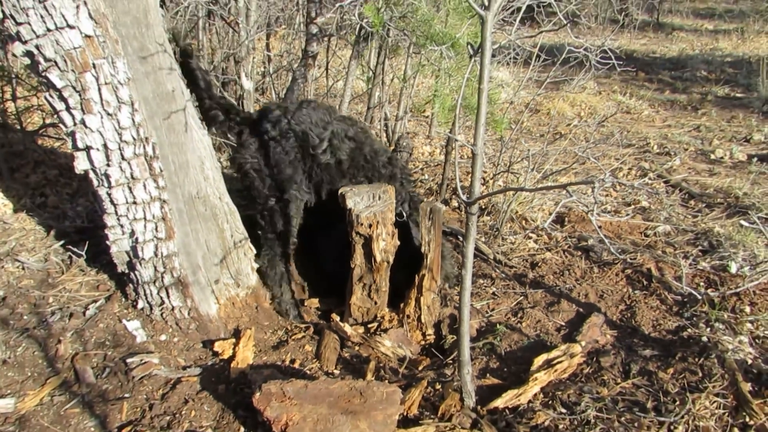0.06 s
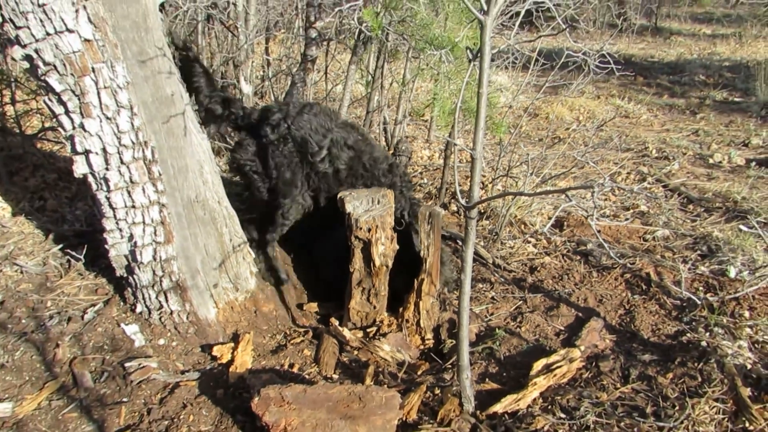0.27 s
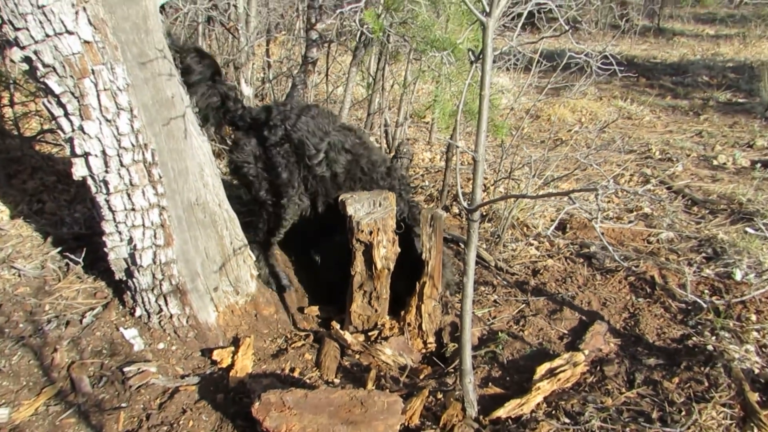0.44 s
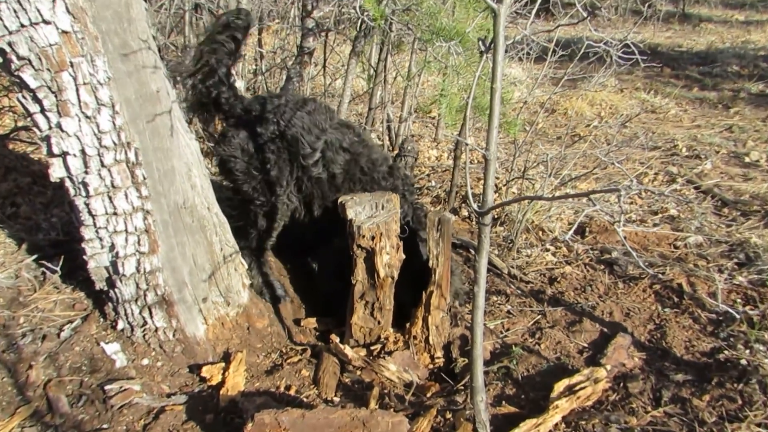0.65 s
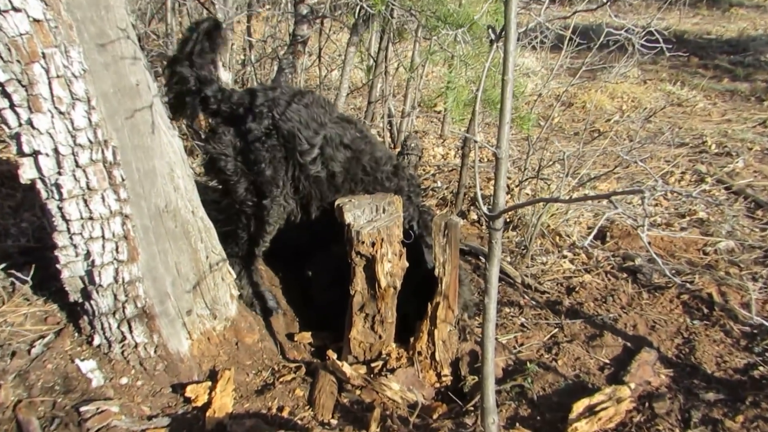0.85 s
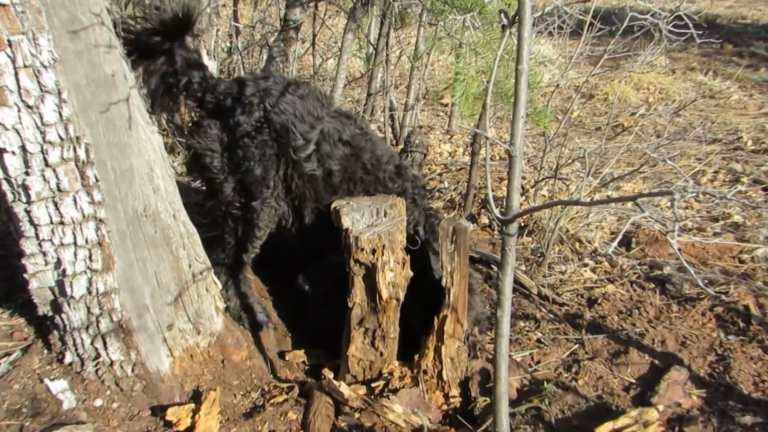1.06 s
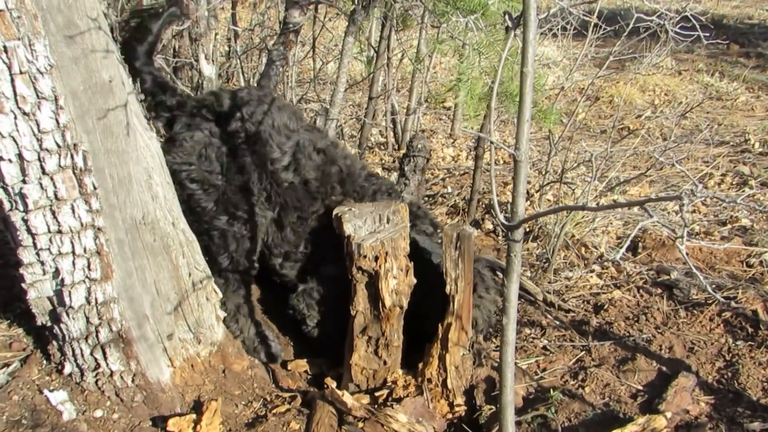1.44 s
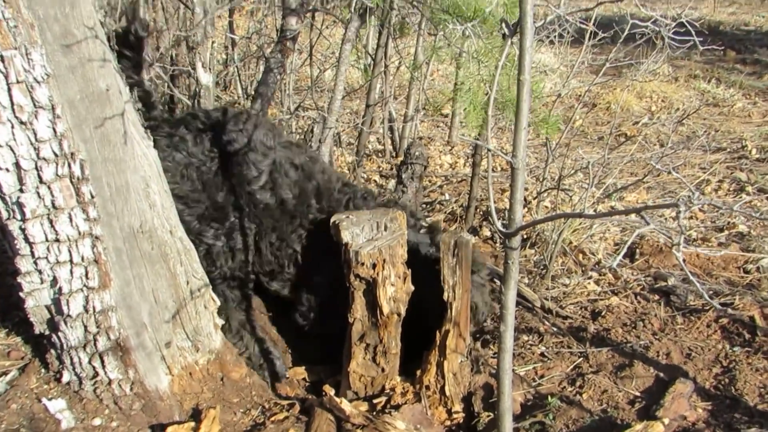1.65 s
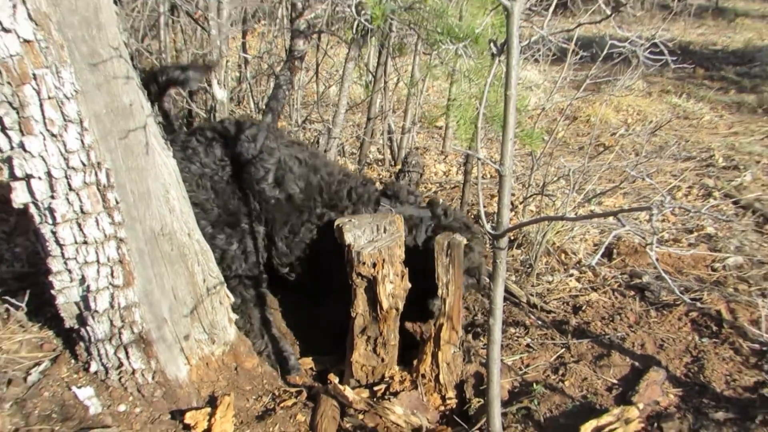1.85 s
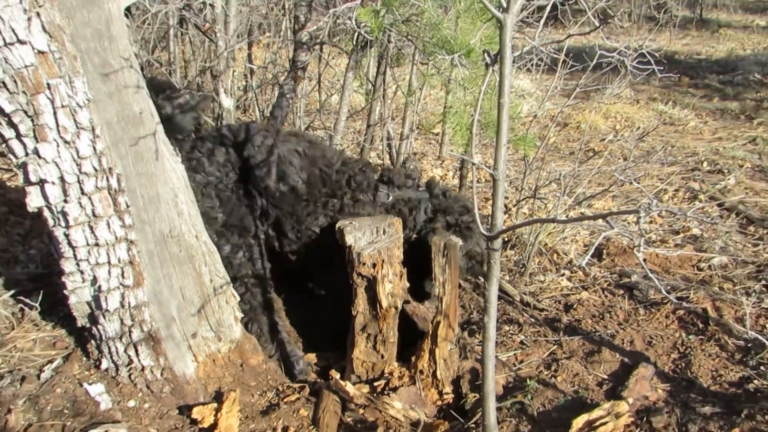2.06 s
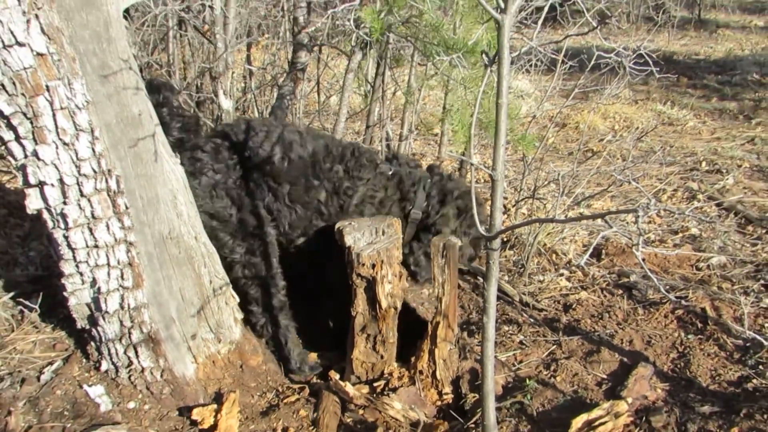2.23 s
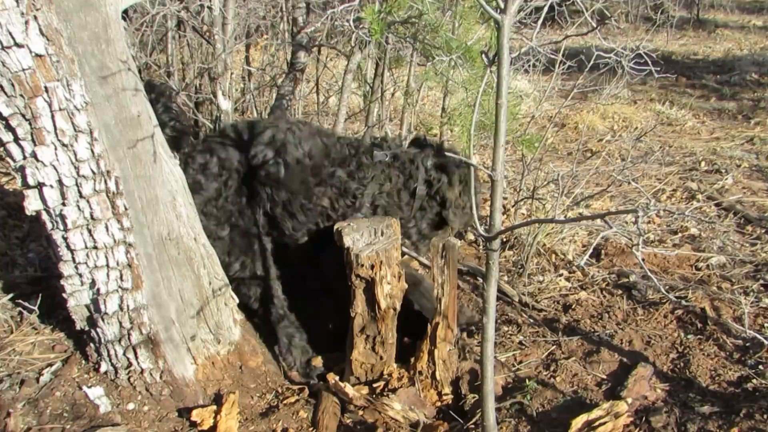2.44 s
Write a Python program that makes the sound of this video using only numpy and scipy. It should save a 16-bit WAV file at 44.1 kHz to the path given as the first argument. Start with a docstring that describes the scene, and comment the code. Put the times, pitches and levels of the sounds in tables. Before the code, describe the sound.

Rotten wood cracks and scrapes as a dog tears at it, with wind buffeting the microphone.

```python
"""Wood scrapes, cracks and splinters as a dog tears at a rotten stump in open woodland.
Each break is a run of snapping fibres that makes the stump ring. Twigs tick and a paw thuds on soil.
Gusts buffet the camera's microphone, pushing its two channels opposite ways and overloading it.
Behind are a soft rush of air in the trees, hiss and the faint whine of the lens motor."""
import sys
import numpy as np
from scipy import signal
from scipy.fft import rfft, irfft, next_fast_len
from scipy.io import wavfile
from scipy.ndimage import uniform_filter1d, minimum_filter1d, map_coordinates

SR = 44100
rng = np.random.default_rng(int(sys.argv[2]) if len(sys.argv) > 2 else 0)


def int16_out(signal):
    """Quantize to a 16-bit WAV file."""
    q = np.round(np.clip(np.atleast_2d(signal).T, -1, 1) * 32767)
    wavfile.write(sys.argv[1], SR, q.astype(np.int16))


N = 110250  # 2.5 seconds

# Loudness shared by the air, hiss and motor, with dips just after the hard gusts: time_s, level_db
BACKGROUND_LEVEL = [(0, -44), (.3, -40), (.53, -38), (.58, -47), (.86, -41.5), (.885, -49), (1.13, -44.5),
                    (1.16, -52), (1.54, -47), (1.6, -45), (1.76, -43), (1.785, -49), (1.99, -44),
                    (2.02, -46), (2.3, -43.5), (2.5, -42)]


def cracks(attack_s=.00028, crack_s=.0028):
    """Snapping fibres ring the stump and the piece that gives way, over a hollow knock."""
    # One row per break: start_s, ring_db, knock_db, snap_db, splinter_db, left_minus_right_db,
    # piece_hz, piece_fade_s, knock_hz, snap_hz, splinter_hz
    breaks = [(0.3201, -24.5, -25.5, -27, -36, -3, 1760, 0.017, 906, 3310, 9700),
              (.354, -36, -39, -38.5, -38.5, -3.5, 1920, 0.015, 1020, 4400, 11300),
              (0.402, -35, -39.5, -39, -57, -2, 1970, .02, 970, 3400, 9500),
              (0.4154, -33.5, -34.5, -44.5, -69, -11, 1980, 0.0081, 1075, 3540, 6900),
              (0.4306, -18, -28, -26, -49, -0.5, 2000, 0.036, 1640, 3320, 8700),
              (1.1363, -35.5, -29.5, -42, -45.5, -1, 1670, 0.042, 1142, 3840, 13700),
              (1.5533, -33.5, -32.5, -35.5, -50, -1, 1757, 0.039, 910, 3450, 11700),
              (1.590, -38, -38.5, -37, -40.5, -1, 2120, 0.011, 1020, 4540, 12300),
              (1.8683, -35.5, -36, -50, -51, -7, 2260, 0.024, 1086, 3900, 10500),
              (1.9951, -33, -28.5, -44, -47, -3.5, 1290, 0.058, 824, 4120, 13400)]
    # Tone of the hollow knock: pitch_hz, level_db
    knock_shape = [(200, -15), (600, 2), (830, 9), (1100, -8.5), (1400, 8.5), (2200, -18), (5000, -107)]
    # Tones of the sharp snap and the thin splinter: pitch_multiple, level_db
    snap_shape = [(.33, -37), (.83, 5), (1, 4), (1.28, 0.5), (1.67, -13.5), (2.1, -11.5), (4.2, -18)]
    splinter_shape = [(.3, 0), (.55, 4.5), (.85, 2), (1, 4.5), (1.2, -9), (1.7, -32)]
    out, t = np.zeros((2, N)), np.arange(SR // 8) / SR

    def fade(fade_s):  # a fast rise, then a fall of 60 dB in fade_s
        return amp(-60 * t / fade_s) * (1 - np.exp(-t / attack_s))

    def same_energy(x):  # as much energy as a level of 1 held for crack_s
        return x / np.sqrt(np.sum(x ** 2, -1, keepdims=True) / (crack_s * SR))

    def tone(hz, fade_s, right_phase):
        phase = 2 * np.pi * hz * t + np.array([[0], [right_phase]])
        return same_energy(np.sin(phase) * fade(fade_s))

    def fibres(fade_s, response, spiky_db=5):
        sizes = amp(spiky_db * rng.standard_normal(len(t)))
        burst = rng.standard_normal((2, len(t))) * sizes * fade(fade_s)
        return same_energy(filtered(burst, response))

    for (start_s, ring_db, knock_db, snap_db, splinter_db, pan_db,
         piece_hz, piece_fade_s, knock_hz, snap_hz, splinter_hz) in breaks:
        piece = amp(1) * tone(piece_hz, piece_fade_s, np.pi / 2)
        ring = amp(ring_db) * same_energy(fibres(.02, stump) + piece)
        hollow = amp(-1) * tone(knock_hz, .027, np.pi / 4)
        knock = amp(knock_db) * same_energy(fibres(.027, colour(knock_shape)) + hollow)
        snap_filter = colour([(k * snap_hz, db) for k, db in snap_shape])
        snap = amp(snap_db) * fibres(.02, snap_filter)
        splinter_filter = colour([(k * splinter_hz, db) for k, db in splinter_shape])
        splinter = amp(splinter_db) * fibres(.014, splinter_filter)
        pan = amp([[pan_db / 2], [-pan_db / 2]])
        add(out, start_s, (ring + knock + snap + splinter) * pan)
    return out


def stump(hz):
    """The stump acts as a filter that favours the few pitches it rings at."""
    # The wood's ringing pitches: pitch_hz, width_hz, level_db
    rings = [(1560, 120, -26), (1840, 420, 7), (2096, 240, 9.5), (2400, 98, 6.5), (2730, 130, 1.5),
             (3240, 35, -48)]
    return sum((-1) ** k * amp(db) * 1j * hz * width / (pitch ** 2 - hz ** 2 + 1j * hz * width)
               for k, (pitch, width, db) in enumerate(rings))


def scrapes():
    """Teeth and claws drag over crumbling wood."""
    # One row per scrape: middle_s, length_s, level_db
    strokes = [(.07, 0.09, -53), (0.197, 0.046, -46), (0.384, 0.066, -43), (0.474, 0.063, -61),
               (0.514, 0.014, -40.5), (0.824, 0.4, -56), (0.989, 0.024, -49.5), (1.426, 0.096, -55),
               (1.645, 0.11, -50), (1.73, 0.0076, -42.5), (1.76, 0.029, -48), (1.864, 0.042, -46)]
    # Tone of the scraping: pitch_hz, level_db
    shape = [(900, 3), (1600, -3.5), (2200, 4), (2600, -2.5), (3300, -16), (5200, -18.5), (7000, -19.5),
             (12000, -22), (15500, -25)]
    return grainy_strokes(strokes, shape, grainy_db=4, alike=-.48)


def twigs():
    """Thin twigs break with one tick each."""
    # One row per twig: start_s, level_db, pitch_hz
    breaks = [(0.981, -52, 6000), (2.2742, -43.5, 11500), (2.4104, -38, 3950)]
    out = np.zeros((2, N))
    for start_s, db, hz in breaks:
        add(out, start_s, tick(db, hz))
    return out


def rustles():
    """Dry litter shifts on the woodland floor."""
    # One row per rustle: middle_s, length_s, level_db
    strokes = [(.185, .07, -68), (.218, 0.0076, -55), (2.22, 0.12, -69.5)]
    # Tone of the dry litter: pitch_hz, level_db
    shape = [(2000, -38), (6000, -2), (12000, 0), (14000, -8), (15500, -22)]
    return grainy_strokes(strokes, shape, grainy_db=3.5, alike=.55)


def paw(start_s=2.204, level_db=-33.5, rise_s=.0033, fade_s=.27):
    """A paw lands in loose earth with a dull thud."""
    # Tone of the thud: pitch_hz, level_db
    shape = [(15, -48), (60, -4), (130, -9), (210, 0.5), (300, -11), (450, -35), (1200, -27), (4000, -41.5),
             (15000, -88)]
    t = np.maximum(np.arange(N) / SR - start_s, 0)
    level = amp(level_db - 60 * t / fade_s) * (1 - np.exp(-t / rise_s))
    return level * steady(noise(shape, alike=.9), span_s=.0175)


def trunk_echo(x, level_db=-19, fade_s=.35):
    """Tree trunks scatter the sound back as a weak, short echo."""
    t = np.arange(SR // 3) / SR
    tail = rng.standard_normal((2, len(t))) * amp(-60 * t / fade_s)
    tail /= np.linalg.norm(tail[0])
    return amp(level_db) * signal.fftconvolve(x, tail, axes=1)[:, :N]


def wind(strong_db=-15, eddies_per_s=70):
    """Stronger wind makes smaller, faster swirls (eddies), so it brightens as it swells."""
    # Wind strength at the microphone: time_s, level_db
    strength = [(0.0, -49), (0.04, -42.5), (0.1, -35), (0.15, -37), (0.2, -39), (0.31, -42), (0.35, -34),
                (0.4, -61), (0.455, -16), (0.505, -22), (0.56, -12.5), (0.59, -24), (0.65, -17),
                (0.69, -27.5), (0.77, -40), (0.8, -21.5), (0.82, -34.5), (0.855, -6.5), (0.88, -22),
                (1.01, -24.5), (1.03, -41), (1.07, -16.5), (1.18, -13.5), (1.2, -28), (1.24, -23.5),
                (1.29, -15.5), (1.43, -27.5), (1.48, -23.5), (1.55, -14), (1.61, -33.5), (1.67, -24.5),
                (1.755, -13.5), (1.78, -25.5), (1.84, -36), (1.9, -31), (1.98, -34.5), (2.07, -26),
                (2.17, -47), (2.19, -40), (2.24, -42), (2.26, -43), (2.34, -34), (2.44, -59), (2.47, -34),
                (2.5, -34)]
    # Tones of the large, middle and small eddies: pitch_hz, level_db
    rumble = [(4, -86), (14, 10.5), (26, 2), (45, 2.5), (80, 1), (130, -5), (250, -27.5), (600, -49.5),
              (1500, -100)]
    body = [(40, -41), (90, -3), (190, -7), (280, -15.5), (450, -31.5), (900, -77), (3000, -120)]
    flutter = [(120, -10.5), (260, 1.5), (390, -5), (560, -11.5), (800, -33), (1300, -40.5), (4000, -110)]
    gust_db = curve(strength) - strong_db
    eddy_count = np.arange(N) * eddies_per_s / SR
    # The smaller eddies come in random lumps.
    lumps = np.tanh(map_coordinates(rng.standard_normal(1000), [eddy_count], mode="wrap"))

    def layer(shape, db, growth, span_s, lumps_db):  # db in a strong gust; growth in dB per dB of wind
        level = amp(db + growth * gust_db + lumps_db * lumps)
        return level * steady(noise(shape, alike=-.9), span_s)

    return (layer(rumble, db=-18.5, growth=.8, span_s=.03, lumps_db=0)
            + layer(body, db=-21.5, growth=1.1, span_s=.02, lumps_db=3)
            + layer(flutter, db=-31.5, growth=1.45, span_s=.025, lumps_db=6))


def buffets(left_lag_s=.00028, left_db=-.8, skew=.12, overload_db=2):
    """Single eddies hit the microphone; the hardest overload it with a tick."""
    # One row per eddy: middle_s, peak_db, half_width_ms
    hits = [(.5395, 3.5, 1.1), (.8675, 4, 1.5), (1.1466, 2.2, .9), (1.7662, 6, 1.15), (.207, -6.5, 4.8),
            (.4761, -6.5, 2.13), (.5335, -1, 1.2), (.5565, 0, 1.9), (.802, -11, 2), (.854, -3, .9),
            (.8595, -4, .9), (1.1205, -5, 1.1), (1.141, -1.5, 1.7), (1.1775, -3, 1.3), (1.289, -13, .7),
            (1.319, -11, .7), (1.373, -6, 1.4), (1.428, -9, 7), (1.504, -2.5, 1.97), (1.546, -5, 1),
            (1.559, -5, 1.3), (1.629, -7.5, 1.82), (2.037, -14.5, 1.31)]
    t = np.arange(N) / SR - np.array([[left_lag_s], [0]])  # an eddy reaches the left side later
    out = np.zeros((2, N))
    for middle_s, db, half_width_ms in hits:
        offset = (t - middle_s) * 1000 / half_width_ms
        offset /= 1 + skew * np.tanh(offset)  # it arrives faster than it leaves
        # One push of pressure, with a rebound on either side.
        out += amp(db) * (1 - offset ** 2 / 2) * np.exp(-offset ** 2 / 2)
        if db > overload_db:
            add(out, middle_s, tick(db=-43, hz=8500))
    return out * np.array([[amp(left_db)], [-1]])  # the channels move opposite ways


def air_and_hiss():
    """Air rushes softly in the trees, with a fine hiss above it."""
    # Tones of the air and the hiss: pitch_hz, level_db
    air_shape = [(30, 3.5), (150, -11), (300, -4.5), (750, -3.5), (1200, -8.5), (2000, -17), (3500, -29),
                 (6000, -50), (15000, -68)]
    hiss_shape = [(500, -32), (2500, 7), (5000, 3.5), (7000, 1.5), (11000, -2.5), (13500, -4), (14500, -32),
                  (15500, -34)]
    air = amp(-2) * noise(air_shape, alike=.57)
    hiss = amp(-19) * noise(hiss_shape, alike=.13)
    return amp(curve(BACKGROUND_LEVEL)) * (air + hiss)


def lens_motor(waver_hz=25, ramp_s=.02):
    """The lens motor makes a thin, unsteady whine that rises and dips with the background."""
    # One row per whine: start_s, end_s, start_hz, end_hz, level_db (relative to the background)
    whines = [(0, .6, 8200, 8330, -29), (.35, .6, 7600, 7330, -30.5), (.6, 1.13, 7310, 7330, -30.5),
              (.6, 2.5, 8370, 8530, -32.5)]
    t, out = np.arange(N) / SR, np.zeros(N)
    for start_s, end_s, start_hz, end_hz, db in whines:
        hz = np.interp(t, [start_s, end_s], [start_hz, end_hz]) + waver_hz * wobble(300)
        on_off = np.clip(np.minimum(t - start_s, end_s - t) / ramp_s, 0, 1)
        out += amp(db) * on_off * np.sin(2 * np.pi * np.cumsum(hz) / SR)
    return out * amp(curve(BACKGROUND_LEVEL))


def grainy_strokes(strokes, shape, grainy_db, alike):
    """Short swells of noise, roughened by a fast flicker in level."""
    t = np.arange(N) / SR
    level = sum(amp(db) * np.exp(-2 * ((t - middle_s) / length_s) ** 2)
                for middle_s, length_s, db in strokes)
    grains = amp(grainy_db * wobble(130))
    return level * unit(grains * noise(shape, alike))


def tick(db, hz, fade_s=.0087, width_octaves=.71):
    """One dry tick of noise around a pitch."""
    t = np.arange(SR // 20) / SR
    band = lambda f: np.exp(-(np.log2((f + 1) / hz) / width_octaves) ** 2 / 2)
    return amp(db - 60 * t / fade_s) * unit(filtered(rng.standard_normal((2, len(t))), band))


def amp(db):
    """Turn decibels into a number to multiply by."""
    return 10 ** (np.asarray(db) / 20)


def unit(x):
    """Scale to an average level (rms) of 1."""
    return x / np.sqrt(np.mean(x ** 2) + 1e-20)


def wobble(samples):
    """A random wander of level 1; more samples make it slower."""
    return unit(uniform_filter1d(rng.standard_normal(N), size=samples))


def curve(rows):
    """Join (time_s, value) rows with straight lines, one value per sample."""
    return np.interp(np.arange(N) / SR, *np.transpose(rows))


def filtered(x, response):
    """Turn each pitch in x up or down by response(hz)."""
    n = x.shape[-1]
    padded = 2 * next_fast_len(n // 2 + 4096)
    hz = np.fft.rfftfreq(padded, 1 / SR)
    return irfft(rfft(x, padded) * response(hz), padded)[..., :n]


def colour(shape):
    """A filter through (pitch_hz, level_db) points that rings only after a hit, never before."""
    def response(hz):
        pitches, db = np.transpose(shape)
        gain = amp(np.interp(np.log(hz + 1), np.log(pitches), db))
        cepstrum = irfft(np.log(gain))
        half = len(cepstrum) // 2
        cepstrum[1:half] *= 2  # move what would come before the hit to after it
        cepstrum[half + 1:] = 0
        return np.exp(rfft(cepstrum))
    return response


def noise(shape, alike):
    """Shaped stereo noise of level 1; alike runs from -1 (opposite channels) to 1 (the same)."""
    shared, opposed = filtered(rng.standard_normal((2, N + 4096)), colour(shape))[:, -N:]
    angle = np.arccos(alike) / 2
    middle, side = np.cos(angle) * shared, np.sin(angle) * opposed
    return unit(np.array([middle + side, middle - side]))


def steady(x, span_s):
    """Even out the swells in a noise that are slower than span_s."""
    power = uniform_filter1d(np.mean(x ** 2, 0), int(span_s * SR))
    return x / np.sqrt(np.abs(power) + 1e-6)


def add(track, start_s, sound):
    """Mix a sound into the track at start_s."""
    part = track[:, round(start_s * SR):][:, :sound.shape[-1]]
    part += sound[..., :part.shape[-1]]


def scene():
    """The dog's work on the stump, the wind and the background."""
    wood = cracks() + twigs() + scrapes() + rustles()
    return wood + trunk_echo(wood) + paw() + wind() + buffets() + air_and_hiss() + lens_motor()


def record(dry):
    """The camera removes two narrow bands, holds down the hardest gusts and cuts the top treble."""
    # The bands removed: pitch_hz, width_hz
    notches = [(3950, 256), (7900, 160)]
    # How the treble falls away: pitch_hz, level_db
    treble = [(14200, 0), (15600, -26)]
    ceiling, limiter_s, top_hz = .98, .004, 15600

    def notch_filter(hz):
        return np.prod([(pitch ** 2 - hz ** 2) / (pitch ** 2 - hz ** 2 + 1j * hz * width)
                        for pitch, width in notches], 0)

    notched = filtered(dry, notch_filter)
    span = int(limiter_s * SR)
    safe_gain = ceiling / np.maximum(np.abs(notched).max(0), ceiling)
    held_gain = minimum_filter1d(safe_gain, span)
    smooth_gain = uniform_filter1d(uniform_filter1d(held_gain, span), span // 2)
    treble_filter = lambda hz: amp(np.interp(hz, *np.transpose(treble))) * (hz < top_hz)
    return filtered(notched * smooth_gain, treble_filter)


dry = scene()
out = record(dry)
int16_out(out)
```